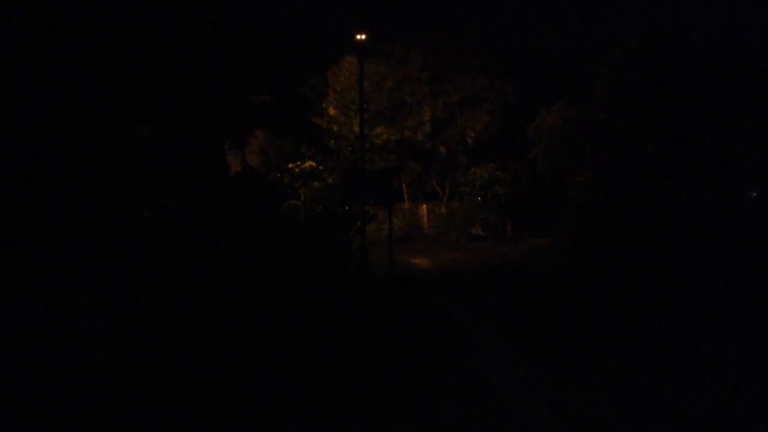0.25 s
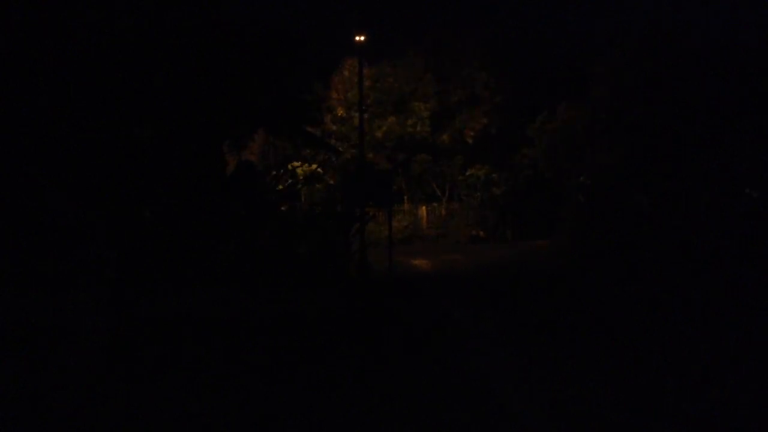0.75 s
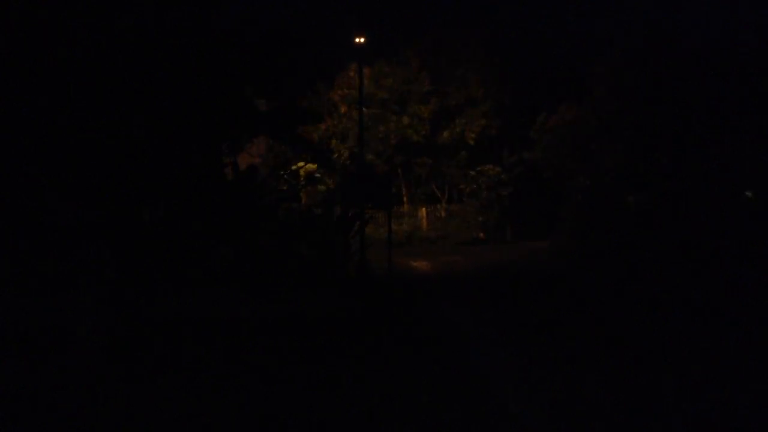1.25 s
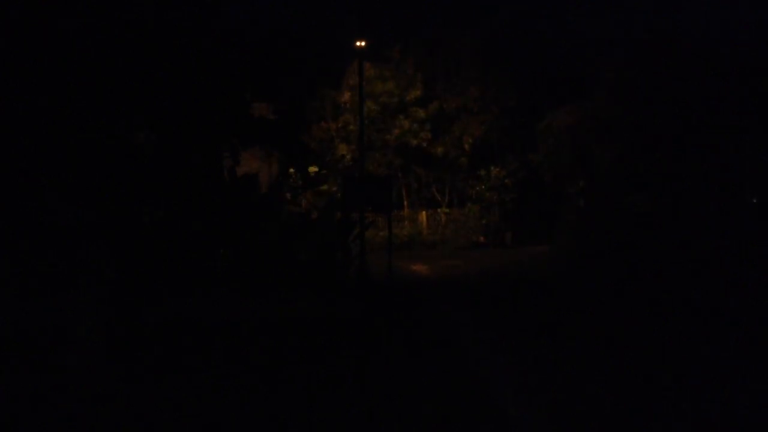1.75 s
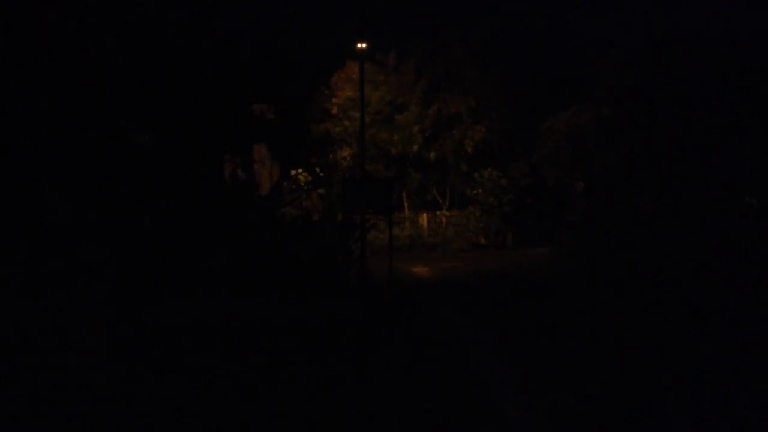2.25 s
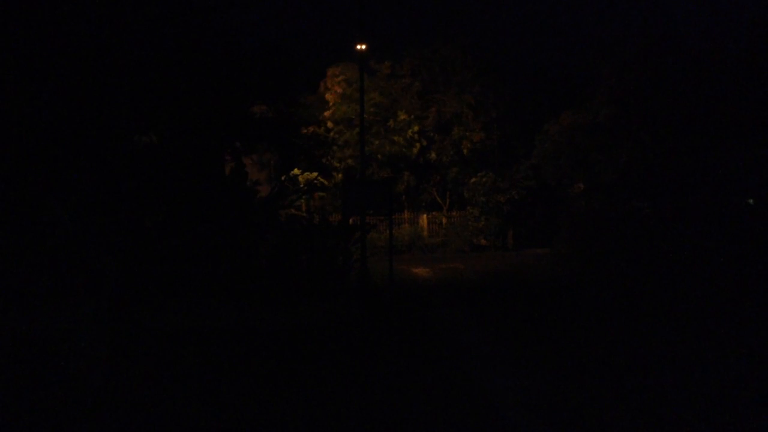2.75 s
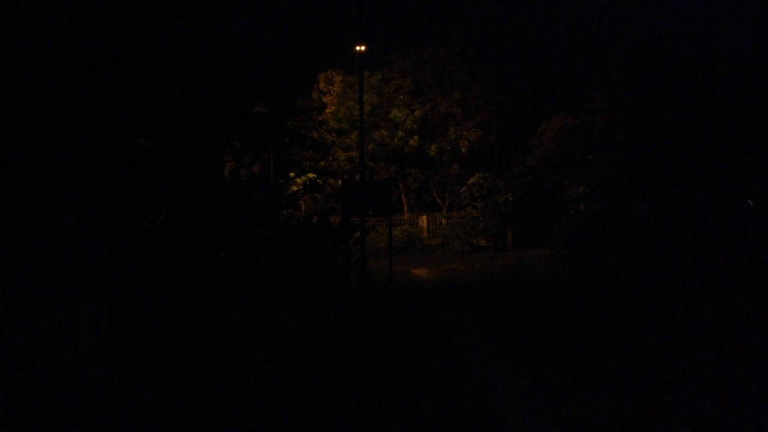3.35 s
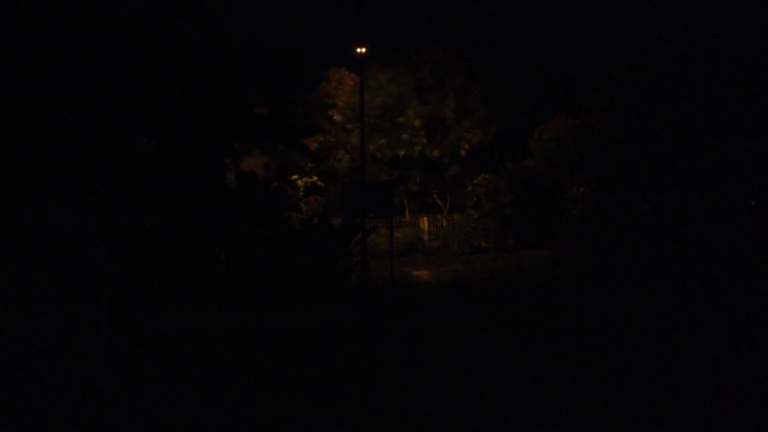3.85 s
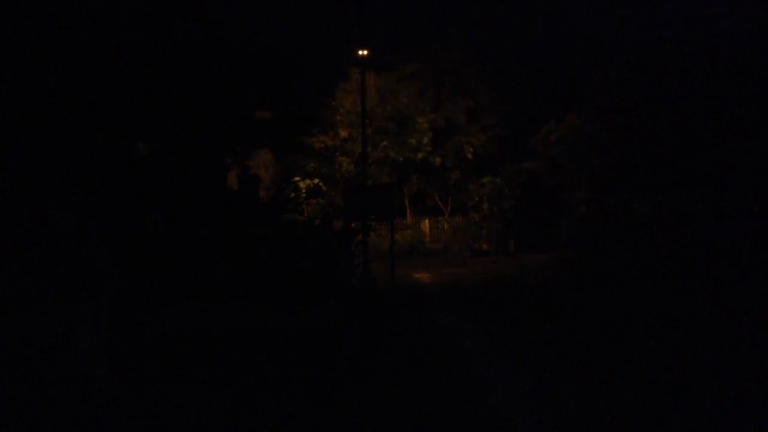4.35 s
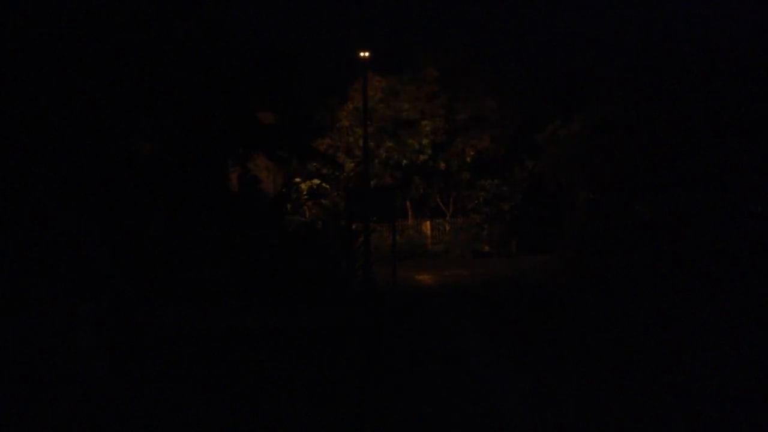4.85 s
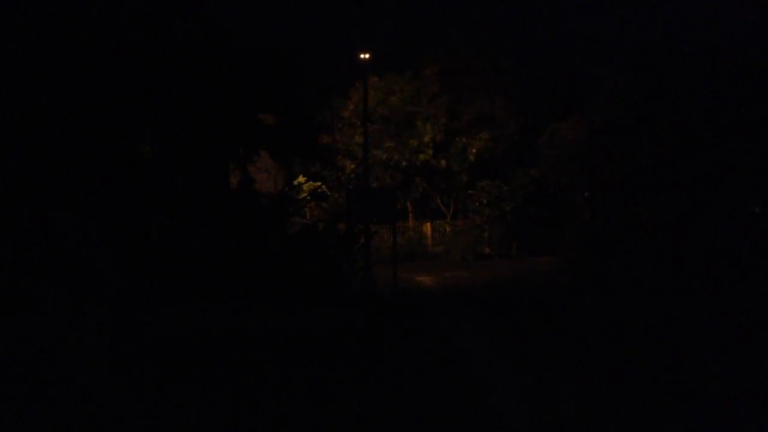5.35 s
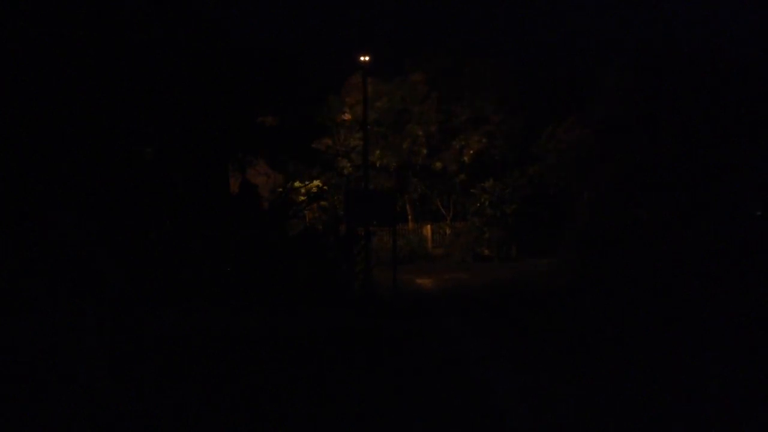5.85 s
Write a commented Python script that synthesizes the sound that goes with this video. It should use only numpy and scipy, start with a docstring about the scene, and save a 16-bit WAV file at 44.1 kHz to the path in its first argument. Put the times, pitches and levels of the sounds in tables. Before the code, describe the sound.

Outdoors on a dark street, strong wind pours through trees: low roar, rush of boughs and bright leaf hiss, gradually easing. Very close to the microphone, a small metal ring and hook clink irregularly throughout, with sharp dry taps. Low thumping wind buffets hit the microphone around one second and again just after four. Mono, close, dry metal over wide wind.

```python
"""Strong wind pours through street trees at night: a low roar, a rush in the boughs and a hiss of leaves, slowly easing.
These are shaped noises that share one wind; short swishes and thin, faltering whistles pass over them.
Close to the microphone two small metal pieces, perhaps a strap's ring and hook, clink as decaying sines and tap.
Gusts buffet the microphone twice, with rumbling noise and thumping resonances.
The mono recorder ducks slightly on the loudest peaks and cuts the extreme treble."""
import sys
import numpy as np
from scipy import signal
from scipy.fft import rfft, irfft, next_fast_len
from scipy.io import wavfile

SR = 44100
rng = np.random.default_rng(int(sys.argv[2]) if len(sys.argv) > 2 else 0)


def store_pcm(level_fs):
    """Save levels as 16-bit WAV."""
    pcm = np.round(np.clip(level_fs, -1, 1) * 32767).astype(np.int16)
    wavfile.write(sys.argv[1], SR, np.atleast_2d(pcm).T)


N = 268436


def from_db(db):
    """Amplitude factor of a level in dB."""
    return 10 ** (np.asarray(db) / 20)


def rms_one(x):
    """Scales a signal to an rms of 1."""
    return x / np.sqrt(np.mean(x ** 2) + 1e-20)


def in_time(rows):
    """Each column of a curve, at every sample."""
    s, *columns = np.transpose(rows)
    return [np.interp(np.arange(N) / SR, s, c) for c in columns]


def drift(corner_hz):
    """Slow chance with a spread of 1: white noise through two equal low-pass poles."""
    step = 40   # samples between drawn points
    r = np.exp(-2 * np.pi * corner_hz * step / SR)
    white = rng.standard_normal(N // step + 2002)
    slow = signal.lfilter([1], [1, -2 * r, r * r], white)[2000:]   # the filter has settled
    return np.interp(np.arange(N) / step, np.arange(len(slow)), rms_one(slow))


def swell(s, half_s):
    """A bell-shaped rise and fall of height 1; half_s is the bell's standard deviation."""
    return np.exp(-.5 * ((np.arange(N) / SR - s) / half_s) ** 2)


def coloured(x, spectrum):
    """Gives a steady white source a spectrum; rms 1."""
    hz, db = np.transpose(spectrum)
    size = next_fast_len(N)
    bins = np.maximum(np.fft.rfftfreq(size, 1 / SR), 1)
    gain = from_db(np.interp(np.log(bins), np.log(hz), db))
    return rms_one(irfft(rfft(x, size) * gain, size)[:N])


def noise(spectrum):
    """Steady noise of a given spectrum; rms 1."""
    return coloured(rng.standard_normal(N), spectrum)


def clicks(times, sizes):
    """Single impulses at the given times."""
    samples = np.clip(np.round(times * SR).astype(int), 0, N - 1)
    return np.bincount(samples, sizes, N)


def resonate(x, hz, t60):
    """A unit click sets a sine ringing from height 1, down 60 dB after t60 seconds."""
    r, w = from_db(-60 / (t60 * SR)), 2 * np.pi * hz / SR
    return signal.lfilter([0, np.sin(w)], [1, -2 * r * np.cos(w), r * r], x + 1e-18)


# Colour of the leaves. Each row: frequency in Hz, relative density in dB per Hz.
LEAF_COLOUR = [(1500, -22), (3000, -0.5), (4000, 3.5), (5000, 4.5), (6500, 3.5), (8000, 2), (10000, 0.5),
               (12000, -0.5), (14000, -1.5), (16000, -6)]


def leaves(hiss_db, slaps_per_s=2500, spread_db=4.0, slap_db=-10, bright_hz=11000, brightening=.35):
    """Countless far leaves merge into hiss, brighter in a gust; nearer ones slap singly, more often in a gust."""
    gust_db = hiss_db - hiss_db.mean()
    rate = slaps_per_s * from_db(gust_db)
    loudness_db = spread_db * np.minimum(rng.exponential(1, N), 5)
    sizes = from_db(loudness_db) * rng.choice([-1, 1], N)
    slaps = rms_one(sizes * (rng.random(N) < rate / SR))
    rustle = coloured(rng.standard_normal(N) + from_db(slap_db) * slaps, LEAF_COLOUR)
    dull = signal.sosfilt(signal.butter(1, bright_hz, fs=SR, output="sos"), rustle)
    treble = (rustle - dull) * from_db(brightening * gust_db)
    flutter_db = .35 * drift(12)
    return (dull + treble) * from_db(hiss_db + flutter_db)


# Wind in the trees; only its swing about the mean counts. Each row: time in seconds, strength in dB.
WIND_STRENGTH = [(0.0, -37.5), (0.93, -36.5), (1.47, -37.5), (1.83, -36), (3.05, -39), (3.59, -39.5),
                 (4.46, -40), (4.86, -40.5), (5.41, -41.5), (6.09, -42.5)]
# Colours of the far woods, the near crowns and the boughs.
# Each row: frequency in Hz, relative density in dB per Hz.
DRONE_COLOUR = [(30, -49), (45, -45), (70, -28), (100, -15), (140, -7), (185, 3), (240, 1), (320, -1),
                (430, -7.5), (650, -12.5), (2000, -59)]
ROAR_COLOUR = [(60, -49), (200, -22), (320, -7), (450, -4), (650, -1.4), (800, -4), (1000, -9.5),
               (1500, -13.5), (3000, -56)]
RUSH_COLOUR = [(300, -37), (650, -4.5), (850, -6.5), (1050, 0.5), (1300, 0), (2000, 0), (3000, -1.05),
               (3800, -3.5), (5000, -11.5), (7000, -30), (12000, -31)]
# each part of the wind: level at mean strength (dB), share of the wind's swing that it follows
DRONE_DB, DRONE_FOLLOWS = -44, 0.98
ROAR_DB, ROAR_FOLLOWS = -44, 0.59
RUSH_DB, RUSH_FOLLOWS = -38.5, 1.1
HISS_DB, HISS_FOLLOWS = -37.6, 1.2


def trees(sway_db=1.15, flurry_db=0.8):
    """One wind drones in the far woods, roars round the near crowns, rushes through the boughs, shakes the leaves."""
    wind_db, = in_time(WIND_STRENGTH)
    gust_db = wind_db - wind_db.mean()
    drone_db = DRONE_DB + DRONE_FOLLOWS * gust_db
    roar_db = ROAR_DB + ROAR_FOLLOWS * gust_db + sway_db * drift(4.7)
    rush_db = RUSH_DB + RUSH_FOLLOWS * gust_db + flurry_db * drift(7.7)
    drone = noise(DRONE_COLOUR) * from_db(drone_db)
    roar = noise(ROAR_COLOUR) * from_db(roar_db)
    rush = noise(RUSH_COLOUR) * from_db(rush_db)
    return drone + roar + rush + leaves(HISS_DB + HISS_FOLLOWS * gust_db)


# One bough thrashing in a flurry. Each row: time of the swell's top in seconds, half length in seconds,
# centre in Hz, half width of the flat band in octaves, level at the top in dB before the flapping.
SWISHES = [(0.478, 0.02, 2720, 0.28, -35.5), (0.71, 0.022, 6300, 0.3, -37), (4.439, 0.05, 1860, 0.73, -37),
           (4.445, 0.038, 580, 0.25, -42.5)]


def swishes(skirt_db=-24, flap_db=1.5):
    """Each flurry swells and dies in a band of its own, ragged with flapping leaves."""
    out = 0
    for s, half_s, hz, octaves, db in SWISHES:
        edges = hz * 2 ** (octaves * np.array([-4, -2, -1, 1, 2, 4]))
        band = np.column_stack([edges, [2 * skirt_db, skirt_db / 2, 0, 0, skirt_db, 2 * skirt_db]])
        ragged = noise(band) * from_db(db + flap_db * drift(120))
        out = out + ragged * swell(s, half_s)
    return out


# families of modes, in the order of the level columns of CLINKS
RING_NOTE, HOOK_NOTE, HOOK_LOW_NOTE, LESSER, OVERTONE, HIGHEST = range(6)
# Modes of the two metal pieces. Each row: frequency in Hz, relative level within the family in dB,
# typical 60 dB decay in seconds, family.
RING = [(3660, -5, .13, LESSER), (3880, -6, .12, LESSER), (4900, -7, .04, RING_NOTE),
        (5180, 0, .118, RING_NOTE), (5250, -7, .05, RING_NOTE), (8912, -1, .13, LESSER),
        (11015, 1, .09, OVERTONE), (11180, -8, .06, OVERTONE), (11360, -1, .08, OVERTONE),
        (14160, -6, .045, HIGHEST), (14520, -2, .05, HIGHEST)]
HOOK = [(4698, 0, .155, HOOK_LOW_NOTE), (6590, 1, .13, LESSER), (6860, 0, .145, HOOK_NOTE),
        (9020, -3, .11, LESSER), (11450, -5, .06, OVERTONE), (11922, 2, .07, OVERTONE),
        (14490, -1, .065, HIGHEST), (14720, -2, .045, HIGHEST)]
# Metal touching metal close to the microphone. Each row: start in seconds, then levels in dB before gain_db
# of the ring's note, the hook's note, the hook's low note, the lesser modes, the overtones and the highest
# overtones, then the frequency in Hz of the overtones that the point of contact favours.
CLINKS = [(0.229, -34, -47, -48, -43, -36, -54, 11350), (0.552, -35, -52, -44, -45, -41, -56, 11640),
          (0.587, -27, -47, -35, -33, -34, -44, 11340), (1.161, -23, -49, -36, -40, -35, -33, 11560),
          (1.174, -30, -56, -42, -56, -56, -40, 11050), (1.243, -44, -25.5, -34, -31, -16, -25, 11830),
          (1.28, -39, -29, -43, -36, -29, -23, 11720), (1.298, -56, -29.5, -56, -39, -35, -37, 11600),
          (1.56, -37, -48, -48, -35, -30, -33, 11620), (1.745, -36, -56, -56, -56, -56, -56, 11460),
          (1.809, -20, -48, -41, -40, -27, -41, 11100), (2.009, -33, -39, -37, -40, -34, -35, 11440),
          (2.025, -56, -31.5, -34, -36, -41, -43, 11140), (2.242, -37, -44, -38, -40, -28, -28, 11150),
          (2.36, -36, -56, -51, -56, -56, -43, 11390), (2.402, -50, -37, -36, -38, -41, -47, 11630),
          (2.736, -34, -43, -38, -32, -23, -34, 11560), (2.744, -38, -31, -39, -34, -27, -36, 11790),
          (2.852, -35, -50, -36, -36, -28, -37, 11500), (2.98, -40, -35, -31.5, -37, -40, -41, 11410),
          (2.991, -27.5, -56, -37, -36, -26.5, -45, 11400), (3.0326, -26, -28, -42, -28, -24, -26, 11720),
          (3.047, -29, -29, -40, -32, -25, -30, 11650), (3.129, -30, -49, -53, -34, -37, -45, 11350),
          (3.344, -30.5, -36, -48, -34.5, -30, -28, 11500), (3.372, -56, -35, -54, -40, -42, -56, 11540),
          (3.443, -37, -56, -56, -51, -41, -51, 11430), (3.497, -56, -40, -38, -46, -41, -42, 11250),
          (3.55, -37, -51, -39, -46, -37, -50, 11570), (4.092, -46, -50, -40, -37, -30, -36, 11290),
          (4.16, -31, -41, -40, -39, -40, -28, 11280), (4.17, -33, -44, -56, -42, -38, -37, 11230),
          (4.223, -33, -39, -51, -43, -41, -39, 11260), (4.581, -27, -56, -51, -56, -35, -56, 11310),
          (4.599, -35, -56, -56, -56, -43, -56, 11280), (4.627, -37, -45, -46, -34, -28, -23, 11240),
          (4.641, -40, -56, -56, -34, -36, -56, 11570), (5.031, -44, -41, -38, -41, -29, -26, 11700),
          (5.043, -50, -30.5, -37, -41, -56, -36, 11920), (5.162, -27.5, -38, -41, -41, -30, -42, 11240),
          (5.341, -47, -46, -56, -49, -39, -46, 11250), (5.393, -34, -40, -49, -41, -33, -45, 11500),
          (5.412, -47, -33, -33.5, -42, -30, -37, 11390), (5.525, -47, -52, -47, -47, -41, -45, 11380),
          (5.539, -32.5, -48, -56, -43, -34, -55, 11100), (5.848, -38, -40, -55, -36, -37, -44, 11470)]
FAVOURED_WIDTH_HZ = 260   # reach of the favoured overtones


def clinks(gain_db=1.7, uneven_db=3.5, detune=0.0026, rebound_db=-15, contact_s=.00009, grip_spread=0.11):
    """Ring and hook touch, from light grazes to sharp strikes; each touch rings both and rebounds twice."""
    hz, mode_db, t60, family = np.transpose(RING + HOOK)
    family = family.astype(int)
    age = np.arange(SR // 4) / SR
    attack = 1 - np.exp(-age / contact_s)
    out = np.zeros(N + SR)
    for s, *family_db, favoured_hz in CLINKS:
        nearness = np.exp(-.5 * ((hz - favoured_hz) / FAVOURED_WIDTH_HZ) ** 2)
        favour = np.where(family == OVERTONE, nearness, 1)
        # the pieces hang differently at each touch, so each mode rings a little longer or shorter
        ring_s = t60 * np.exp(grip_spread * rng.standard_normal(len(hz)))
        decay = attack * from_db(-60 * age / ring_s[:, None])
        touches = s + np.cumsum([0, *rng.uniform(0.0032, 0.018, 2)])
        for bounce, when in enumerate(touches):
            # the point of contact shares a family's energy among its modes and shifts their pitch slightly
            share = favour * from_db(mode_db + uneven_db * rng.standard_normal(len(hz)))
            share = share / np.sqrt(np.bincount(family, share ** 2))[family]
            height = share * from_db(family_db)[family] * from_db(gain_db + bounce * rebound_db)
            pitch = hz * (1 + detune * rng.standard_normal(len(hz)))
            polarity = rng.choice([-1, 1], len(hz))
            modes = decay * np.sin(2 * np.pi * pitch[:, None] * age)
            start = int(when * SR)
            out[start:start + len(age)] += (polarity * height) @ modes
    return out[:N]


# Hard taps of the metal pieces, cracks and short knocks, some along with a ringing clink.
# Each row: start in seconds, crack in dB, knock in dB.
TAPS = [(.694, -22, -45), (2.8525, -29, -25), (3.165, -23, -31), (4.1203, -22.5, -20),
        (4.1584, -20.5, -21.5), (5.018, -27, -34), (5.0302, -24, -38), (5.043, -41, -45),
        (5.1517, -22.5, -29), (5.849, -35, -38)]
# Colour of crack and scuff. Each row: frequency in Hz, relative density in dB per Hz.
TAP_COLOUR = [(300, -45), (1200, -25), (2500, -20), (3800, 3.5), (5500, 6.5), (8000, 4), (12000, 4.5),
              (14500, 0), (16000, -8)]
# Modes of the pieces pressed together, damped.
# Each row: frequency in Hz, level relative to the knock in dB, 60 dB decay in seconds.
KNOCK_MODES = [(2750, -10.5, 0.017), (3440, -6, 0.015), (3850, -4, 0.012), (4260, -11, 0.013)]
CRACK_DB = 1   # crack of a clink, relative to the overtone level in CLINKS
CRACK_MAX_DB = -25   # the hardest clinks ring louder but crack no more than this


def taps(decay_s=0.00074, scuff_s=0.036, scuff_db=-17):
    """Every clink and tap opens with a bright crack and trails off in a soft scuff; the taps add a short knock."""
    tap_s, tap_db, knock_db = np.transpose(TAPS)
    clink_s, *_, overtones_db, _, _ = np.transpose(CLINKS)
    clink_db = np.minimum(overtones_db + CRACK_DB, CRACK_MAX_DB)
    contacts = clicks(tap_s, from_db(tap_db)) + clicks(clink_s, from_db(clink_db)) + 1e-18
    crack = signal.lfilter([1], [1, -np.exp(-1 / (decay_s * SR))], contacts)
    scuff = signal.lfilter([1], [1, -np.exp(-1 / (scuff_s * SR))], contacts)
    blows = clicks(tap_s, from_db(knock_db))
    knock = 0
    for k, (hz, db, t60) in enumerate(KNOCK_MODES):
        knock = knock + (-1) ** k * from_db(db) * resonate(blows, hz, t60)   # alternating polarity
    return (crack + from_db(scuff_db) * scuff) * noise(TAP_COLOUR) + knock


# Puffs of air that reach the microphone.
# Each row: start of the hold in seconds, its length in seconds, rumble in dB before the lumps.
PUFFS = [(0.0, 0.022, -41), (.8, .12, -65), (0.96, 0.041, -43), (1.23, 0.17, -44.5), (1.5, 0.018, -53),
         (4.036, 0.38, -57), (4.508, .015, -47)]
PUFF_ATTACK_S, PUFF_RELEASE_S, CALM_RUMBLE_DB = 0.027, 0.024, -80
# Eddies that thump the microphone. Each row: start in seconds, peak in dB, frequency in Hz.
BUFFETS = [(0.807, -34, 160), (0.976, -39, 149), (1.243, -23, 177), (1.37, -26, 194), (1.505, -36, 110),
           (4.018, -39, 220), (4.053, -24.5, 216), (4.107, -28.5, 213), (4.138, -31, 225),
           (4.158, -33, 250), (4.249, -35, 200), (4.284, -23, 201), (4.348, -31, 216), (4.45, -29, 243)]
# Colours of the rumble in the microphone's port and of the churning air round an eddy.
# Each row: frequency in Hz, relative density in dB per Hz.
PORT_COLOUR = [(25, -32), (45, -34), (70, -12), (110, 3), (160, 8.5), (250, -3.5), (400, -17), (1000, -20)]
WAKE_COLOUR = [(50, -45), (110, -12), (170, -3), (230, 5), (310, -3.5), (480, -9), (1000, -32)]
WAKE_DB, WAKE_HALF_S = -22, 0.036   # mean level relative to the eddy's peak, half length


def microphone_wind(cycles=2.8, low_cut_hz=115, lumpy_db=4.0, churn_db=1.5):
    """Puffs rumble in the port; single eddies thump for a few cycles, joined by churning air."""
    low_cut = signal.butter(3, low_cut_hz, "high", fs=SR, output="sos")
    t, flow = np.arange(N) / SR, from_db(CALM_RUMBLE_DB)
    for s, length_s, db in PUFFS:
        rise = np.maximum(s - t, 0) / PUFF_ATTACK_S
        fall = np.maximum(t - s - length_s, 0) / PUFF_RELEASE_S
        flow = flow + from_db(db) * np.exp(-rise - fall)
    out = noise(PORT_COLOUR) * flow * from_db(lumpy_db * drift(40))
    churn = noise(WAKE_COLOUR) * from_db(WAKE_DB + churn_db * drift(40))
    for s, db, hz in BUFFETS:
        # two equal resonances in a row soften the onset
        push = resonate(clicks(np.array([s]), [1]), hz, cycles / hz)
        thump = signal.sosfilt(low_cut, resonate(push, hz, cycles / hz))
        out = out + from_db(db) * (thump / np.abs(thump).max() + churn * swell(s, WAKE_HALF_S))
    return out


# Thin whistles in the wind. Each row: time of the swell's top in seconds, half length in seconds,
# pitch at the top in Hz before the waver, rms level at the top in dB before the falter.
WHISTLES = [(4.801, 0.12, 7620, -53), (5.257, 0.17, 7550, -53), (5.76, .08, 6860, -51)]
WHISTLE_SAG_HZ = 450   # how far the pitch falls as the swell dies


def whistle(waver_hz=150, falter_db=3.5):
    """An unsteady edge tone whose pitch and level rise and fall with the air speed."""
    out = 0
    for s, half_s, top_hz, db in WHISTLES:
        speed = swell(s, half_s)
        hz = top_hz - WHISTLE_SAG_HZ * (1 - speed) + waver_hz * drift(117)
        out = out + from_db(db) * speed * np.sin(2 * np.pi * np.cumsum(hz) / SR)
    return np.sqrt(2) * out * from_db(falter_db * drift(24))


def scene():
    """Everything reaches one microphone, so both channels are alike."""
    mono = trees() + swishes() + clinks() + taps() + microphone_wind() + whistle()
    return np.array([mono, mono])


def gain_control(x, threshold_db=-17, slope=0.058, release_db_per_s=35, attack_s=0.0047):
    """Peaks over the threshold pull the gain down by a share of their excess; it creeps back at a steady rate."""
    peak_db = 20 * np.log10(np.abs(x).max(axis=0) + 1e-9)
    over_db = np.maximum(peak_db - threshold_db, 0)
    ramp = release_db_per_s * np.arange(N) / SR
    held_db = np.maximum.accumulate(slope * over_db + ramp) - ramp
    r = np.exp(-1 / (attack_s * SR))
    return x * from_db(-signal.lfilter([1 - r], [1, -r], held_db))


CUTOFF_HZ = 15300


def record(dry):
    """The recorder's gain control acts first, then a steep low-pass cuts the top."""
    top_cut = signal.ellip(12, .1, 80, CUTOFF_HZ, fs=SR, output="sos")
    return signal.sosfilt(top_cut, gain_control(dry))


dry = scene()
out = record(dry)
store_pcm(out)
```